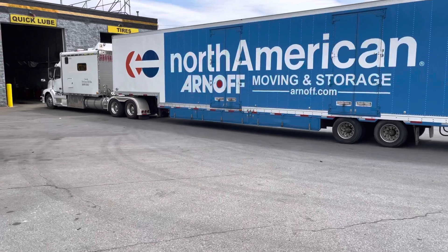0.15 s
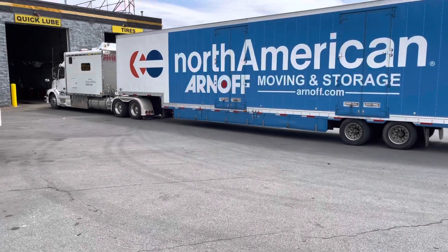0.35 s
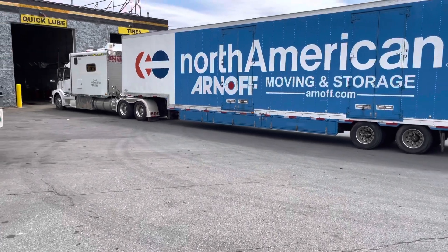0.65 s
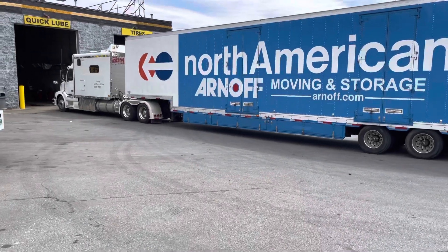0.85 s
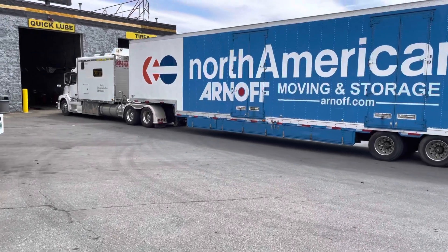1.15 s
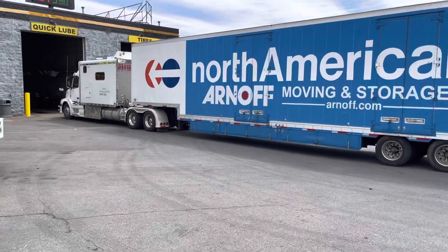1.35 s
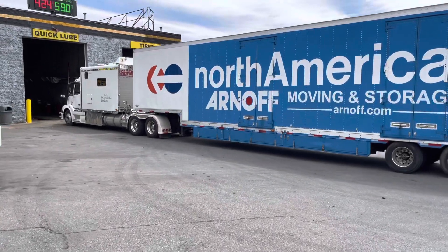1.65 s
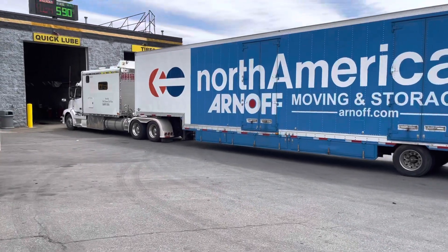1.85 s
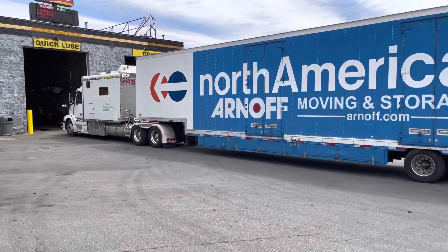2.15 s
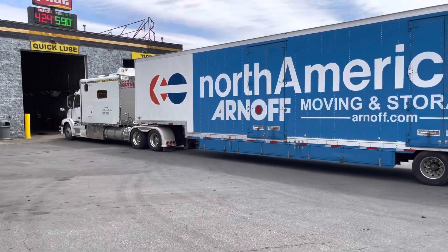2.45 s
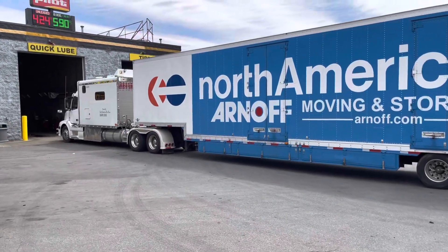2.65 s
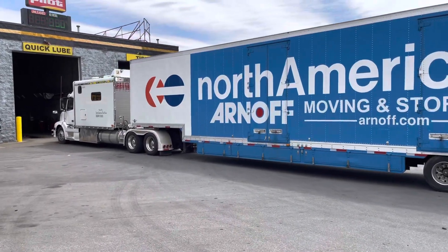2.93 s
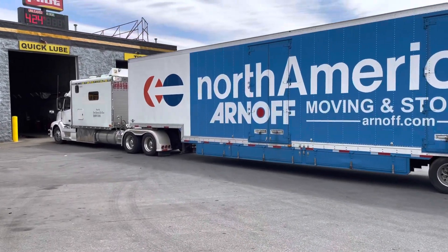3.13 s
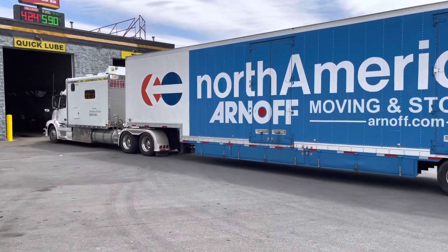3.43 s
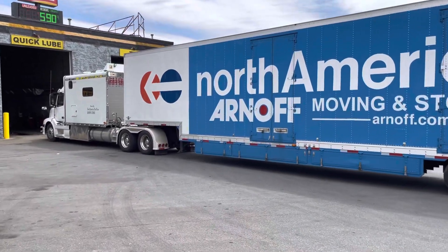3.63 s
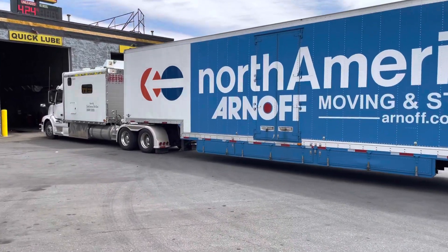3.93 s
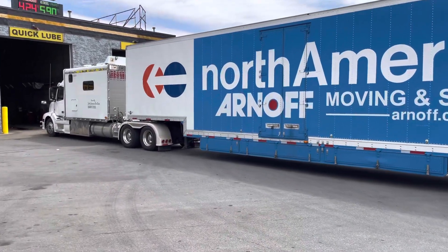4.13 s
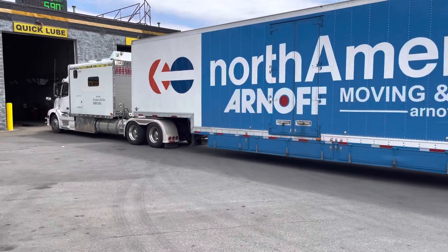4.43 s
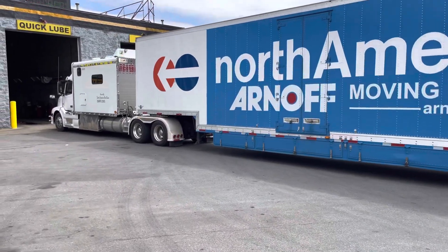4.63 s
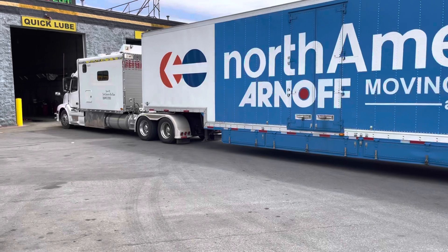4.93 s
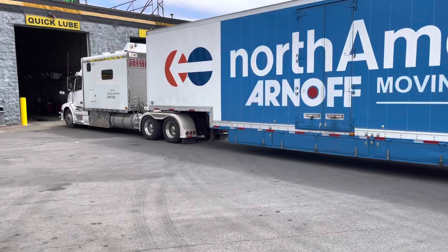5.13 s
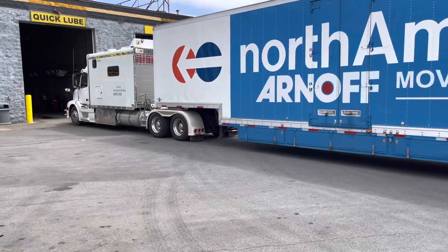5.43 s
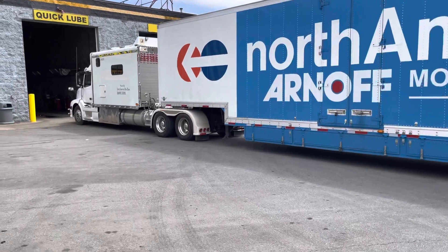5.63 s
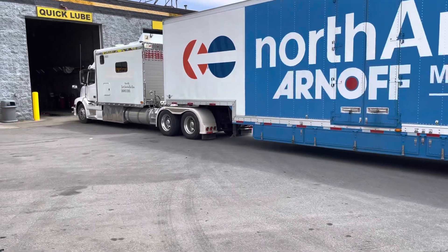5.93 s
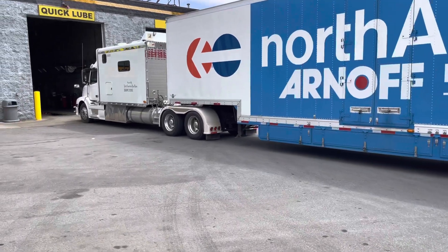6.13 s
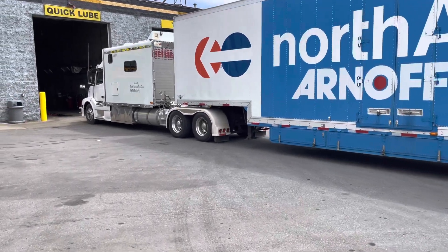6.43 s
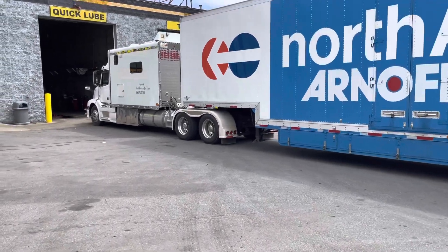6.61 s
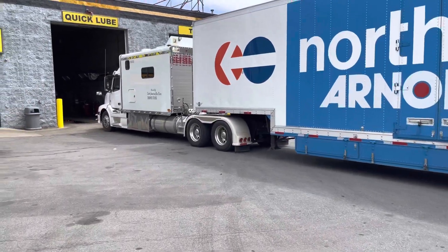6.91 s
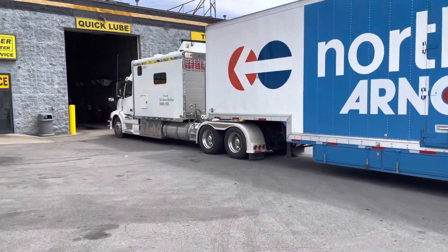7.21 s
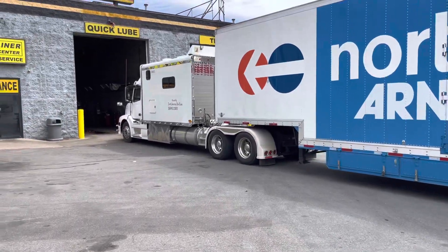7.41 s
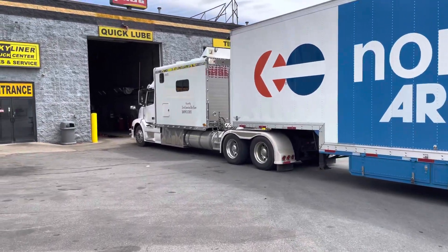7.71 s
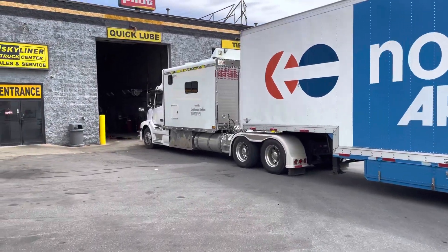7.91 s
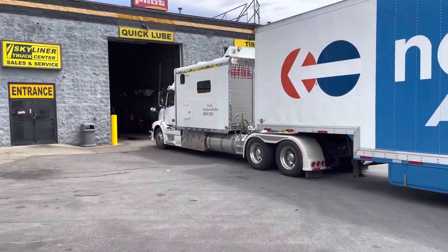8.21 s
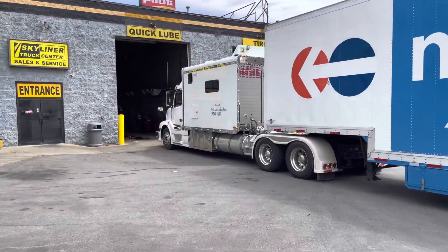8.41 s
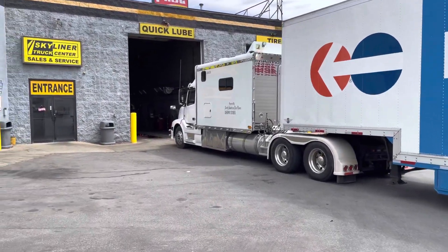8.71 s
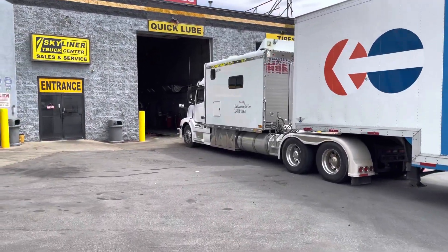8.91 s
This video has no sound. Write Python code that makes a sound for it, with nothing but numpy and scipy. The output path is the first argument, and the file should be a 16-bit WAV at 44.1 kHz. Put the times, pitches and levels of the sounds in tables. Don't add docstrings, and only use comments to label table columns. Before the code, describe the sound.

Outdoors on a paved truck lot, a large diesel idles continuously over a low generator hum and far traffic rumble. Another heavy engine passes, its deep tone swelling at two to four seconds and falling in pitch, then returning in weak echoes off walls. Small grit snaps and a dull footstep tap follow. Near the end a belt hisses and air blows off. Wide handheld stereo pickup, moving closer to the cab.

```python
import sys
import numpy as np
from scipy import signal
from scipy.fft import rfft, irfft, next_fast_len
from scipy.io import wavfile
from scipy.ndimage import uniform_filter1d, map_coordinates

SR = 44100
rng = np.random.default_rng(int(sys.argv[2]) if len(sys.argv) > 2 else 0)


def pcm_store(signal):
    levels = np.round(np.clip(np.atleast_2d(signal), -1, 1) * 32767)
    wavfile.write(sys.argv[1], SR, levels.astype(np.int16).T)


def field_ratio(decibels):
    return 10 ** (np.asarray(decibels, dtype=float) / 20)


N = 399546

# pitch_hz, side_minus_mid_db
WIDTH = [(40, -15.5), (100, -16.5), (200, -11.5), (350, 0.5), (640, -1), (1160, 5), (2090, 1), (3500, -1),
         (6500, -2), (8200, 0.5), (8900, -5), (9700, 7), (10400, 14), (11200, -2)]


def unit(x):
    return x / np.sqrt(np.mean(x ** 2) + 1e-20)


def along(points, hz):
    point_hz, value = np.transpose(points)
    return np.interp(np.log(hz + 1), np.log(point_hz + 1), value)


def curves(rows):
    s, *cols = np.transpose(rows)
    return [np.interp(np.arange(N) / SR, s, c) for c in cols]


def bell(middle_s, half_s):
    return np.exp(-np.abs((np.arange(N) / SR - middle_s) / max(half_s, .01)) ** 2.9)


def bells(rows):
    return sum(db * bell(middle_s, half_s) for middle_s, half_s, db in rows)


def wobble(knots_hz):
    knots = rng.standard_normal(int(N * 40 / SR) + 4)
    return map_coordinates(knots, [np.arange(N) * knots_hz / SR])


def filtered(x, response):
    m = next_fast_len(N + 8192)
    return irfft(rfft(x, m) * response(np.fft.rfftfreq(m, 1 / SR)), m)[..., :N]


def rush(spectrum, patchy_db):
    z = signal.stft(rng.standard_normal((2, N + 512)), nperseg=512)[2]
    field = uniform_filter1d(rng.standard_normal(z.shape[1:]), size=6, axis=0)
    field = uniform_filter1d(field, size=14, axis=1)
    pair = signal.istft(z * field_ratio(patchy_db * unit(field)), nperseg=512)[1][:, :N]
    linked = .3
    trio = [pair[0], linked * pair[0], np.sqrt(1 - linked ** 2) * pair[1]]

    def response(hz):
        level_db = along(spectrum, hz) + [[0], [1], [1]] * along(WIDTH, hz)
        return field_ratio(level_db) * [[1], [-1j], [1]]

    mid, late, free = filtered(trio, response)
    return np.array([mid + late + free, mid - late - free]) / np.std(mid)


def order(shaft_hz, drift, multiple=1):
    turns = multiple * np.cumsum(shaft_hz) / SR
    phase = 2 * np.pi * turns + drift * wobble(3) + rng.uniform(0, 2 * np.pi)
    apart = np.arctan(field_ratio(along(WIDTH, multiple * np.mean(shaft_hz))))
    return np.sqrt(2) * np.sin(phase + np.array([[-apart], [apart]])) / np.cos(apart)


def steady(hz, drift, multiple=1):
    return order(np.full(N, hz), drift, multiple)


def traffic():
    # pitch_hz, density_db
    throb_band = [(21, -36), (36, -9), (75, 4.5), (110, -5.5), (140, -18), (240, -120)]
    # pitch_hz, density_db
    rumble_band = [(56, -35), (95, -2), (392, -13.5), (440, -25.5), (480, -24), (620, -36), (1060, -120)]
    # middle_s, half_s, rise_db
    passes = [
        (1.8, 0.42, 1.5),
        (4.45, 0.66, 2.5),
        (8.8, 0.15, 2),
    ]
    t = np.arange(N) / SR
    throb_db = -28 - 0.68 * t + 0.91 * wobble(3)
    rumble_db = -31.5 - 0.22 * t + bells(passes) + 1.17 * wobble(4)
    throb = field_ratio(throb_db) * rush(throb_band, patchy_db=2.0)
    return throb + field_ratio(rumble_db) * rush(rumble_band, patchy_db=1.23)


def firings(rise_s, decay_s):
    cylinders_db = [0, -14, -22, -18, -7, -20]
    cycle_hz, first_loud_s = 5.434, .06
    times = np.arange(first_loud_s - 1 / cycle_hz, N / SR, 1 / (6 * cycle_hz))
    sizes = field_ratio(np.resize(cylinders_db, len(times)) + 1.5 * rng.standard_normal(len(times)))
    train = np.zeros((2, N))
    keep = times > 0
    train[:, (times[keep] * SR).astype(int)] = [np.ones(keep.sum()), sizes[keep]]
    t = np.arange(SR // 8) / SR
    puff = (1 - np.exp(-t / rise_s)) * np.exp(-t / decay_s)
    return signal.fftconvolve(train, puff[None], axes=1)[:, :N]


def diesel_and_air():
    # time_s, level_db
    idle = [(0, -35.5), (.9, -33.5), (1.7, -33.5), (2.5, -34.5), (3.2, -34.5), (4.6, -35.5), (5.4, -34),
            (6.5, -35), (7.9, -34), (8.5, -34), (9.06, -32.5)]
    # pitch_hz, density_db
    body_band = [(260, -43.5), (450, 0.5), (486, -6.5), (555, -2), (666, -0.5), (766, -1), (1040, -8),
                 (1350, -7.5), (1600, -12), (2100, -22), (3100, -50), (5300, -120)]
    # pitch_hz, density_db
    block_band = [(1100, -39.5), (1600, -2), (2100, 5), (2400, -1.5), (2700, -1.5), (3000, -5), (3300, -6),
                  (3700, -14.5), (4600, -38), (9000, -120)]
    # middle_s, half_s, rise_db
    surges = [
        (2.15, 0.2, 1.7),
        (2.6, 0.34, 2.7),
        (4.9, 0.29, 1.8),
        (8.9, 0.13, 1.7),
    ]
    # pitch_hz, density_db
    hiss_band = [(2600, -36), (3700, -5), (4100, -3.5), (5550, -4.5), (6520, -10), (7130, -18.5),
                 (7990, -14.5), (9270, -17), (10100, -32.5), (11000, -18), (11800, -24), (13000, -41),
                 (22000, -120)]
    # middle_s, half_s, rise_db
    scuffs = [
        (.55, 0.025, 4),
        (2.6, 0.9, 1.5),
        (3.7, 0.6, 1),
        (4.88, 0.22, 4.5),
        (5.87, .06, 3),
        (6.2, 0.15, 3),
        (6.7, .2, 2.5),
        (8.93, .22, 6),
    ]
    # time_s, level_db
    puffs = [(0, -76), (3, -74.5), (6, -73), (6.6, -70.5), (9.06, -70)]
    # pitch_hz, density_db
    valve_band = [(6000, -40), (8500, -14), (9400, 0), (10400, -3), (11100, 2), (11900, -10), (13000, -60)]
    body_db = curves(idle)[0]
    beat, ticks = firings(rise_s=.01, decay_s=.02)
    pulse = unit(1 + .035 * unit(beat - beat.mean()))
    body = field_ratio(body_db) * pulse * rush(body_band, patchy_db=1.18)
    block = field_ratio(body_db - 13.5 + bells(surges)) * pulse * rush(block_band, patchy_db=1.5)
    hiss_db = -56.5 + 0.2 * np.arange(N) / SR + bells(scuffs) + 0.62 * wobble(12)
    hiss = field_ratio(hiss_db) * pulse * rush(hiss_band, patchy_db=1.33)
    valves = field_ratio(curves(puffs)[0]) * unit(unit(ticks) + .35) * rush(valve_band, patchy_db=.5)
    whine = field_ratio(-78 + 3 * wobble(2)) * steady(5503., drift=1.5)
    return body + block + hiss + valves + whine


def generator():
    # middle_s, half_s, change_db
    shadows = [
        (2.76, .06, -9),
        (5, 0.96, -4),
        (7.32, .06, -2),
        (8.35, 0.34, -16),
    ]
    level_db = -24.5 - 1.38 * np.arange(N) / SR + bells(shadows)
    return field_ratio(level_db) * steady(44.97, drift=.1)


def fan():
    # blade_rate_multiple, rms_db
    blades = [(1, -44), (2, -43), (3, -50.5), (4, -48), (6, -49)]
    # middle_s, half_s, rise_db
    gaps = [
        (4.5, 0.2, 5.5),
        (5.7, .3, 4),
        (8.7, 0.43, 4.5),
    ]
    gap_db = bells(gaps)
    return sum(field_ratio(db + gap_db + 2.64 * wobble(5)) * steady(73.9, drift=0.64, multiple=k)
               for k, db in blades)


def panels():
    panel_hz = (569, 681, 748)
    # time_s, low_db, middle_db, high_db
    levels = [(0, -50.5, -58, -52), (1.4, -48, -61, -52), (2, -51, -57, -45), (2.8, -47, -58, -56),
              (4, -52.5, -60, -58), (5.3, -53, -52, -63), (7.3, -55, -50.5, -56), (9.06, -54, -49, -48)]
    return sum(field_ratio(db + 3.4 * wobble(7.2)) * steady(hz, drift=4.85)
               for hz, db in zip(panel_hz, curves(levels)))


def passer():
    # time_s, crank_hz, left_minus_right_db
    crank = [(0, 28.37, -2), (2, 27.18, 2.5), (4.1, 25.29, -1), (5, 24.7, 1), (5.9, 23.58, 2),
             (7.6, 22.62, 1), (9.06, 21.25, -1.5)]
    # time_s, rms_db
    firing = [(0, -33), (.9, -34.5), (2.1, -27), (2.33, -19), (2.65, -25.5), (2.87, -19.5), (3.3, -16),
              (3.7, -19.5), (3.78, -25.5), (4.02, -24), (4.14, -19), (4.5, -24.5), (5.14, -24.5),
              (5.26, -38.5), (9.06, -34)]
    # middle_s, half_s, change_db
    echoes = [
        (5.72, 0.15, 7),
        (5.98, 0.087, -13),
        (6.3, 0.24, 10),
        (7.08, 0.24, 7),
        (7.82, 0.25, 11),
        (8.25, 0.24, 4.5),
        (8.8, 0.1, 6.5),
    ]
    # crank_multiple, quiet_rms_db
    side_orders = [(5, -41.5), (7, -44.5), (8, -47), (11, -51)]
    # side_order_index, middle_s, half_s, top_rms_db
    swells = [(0, 3.83, 0.033, -24), (0, 4.42, 0.18, -27), (0, 5.0, 0.11, -27.5), (1, 1.1, .15, -41.5),
              (1, 1.73, 0.11, -37.5), (1, 2.11, 0.082, -30.5), (1, 2.9, 0.47, -33), (1, 4.0, .12, -34),
              (1, 4.67, 0.45, -32.5), (2, 3.85, 0.11, -34), (2, 4.42, .15, -32), (2, 4.9, 0.11, -32.5),
              (2, 5.9, .4, -40.5), (3, 3.75, 0.066, -36), (3, 4.75, 0.18, -42)]
    crank_hz, pan_db = curves(crank)
    crank_hz = uniform_filter1d(crank_hz, size=SR // 2)
    firing_db = curves(firing)[0] + bells(echoes) + 1.2 * wobble(11)
    out = field_ratio(firing_db) * order(crank_hz, drift=.2, multiple=4)
    for index, (multiple, quiet_db) in enumerate(side_orders):
        gain = field_ratio(quiet_db + 3.33 * wobble(7))
        for which, middle_s, half_s, top_db in swells:
            if which == index:
                gain = gain + field_ratio(top_db - 1.5) * bell(middle_s, half_s)
        out = out + gain * field_ratio(1.8 * wobble(13)) * order(crank_hz, drift=.6, multiple=multiple)
    return out * field_ratio(pan_db * np.array([[.5], [-.5]]))


def steps():
    # start_s, peak_db, centre_hz, left_minus_right_db, width_octaves
    grit = [(.536, -36, 6500, -2, 0.65), (0.7574, -46, 3280, -5, 0.054), (1.7533, -44, 7002, 3, 0.7),
            (2.3406, -43, 7500, 4, 0.606), (2.604, -38.5, 7740, -2, 0.44), (2.619, -42.5, 9460, -3, .5),
            (3.22, -39, 9750, 4, 0.72), (3.8543, -39, 5750, 2, 0.45), (4.03, -39, 3320, 2, .3),
            (4.681, -46, 8320, 2, 0.35), (5.68, -44.5, 7360, 3, 0.72), (5.837, -50, 9000, 4, .5),
            (5.8546, -29, 3970, -1, 1.8), (5.872, -29, 6960, 2.5, 2.7), (6.0072, -39.5, 10500, 4, 0.73),
            (6.2861, -39.5, 11050, 3, 0.45), (6.4747, -45.5, 8914, 1, 0.27), (7.4644, -48, 7001, 4, 0.47),
            (7.6115, -33, 7000, 3, 1.1), (7.7143, -38.5, 6000, 1, 0.69)]
    # start_s, level_db, pitch_hz, t60_s
    knock = [
        (5.8546, -18, 780, .012),
        (5.855, -28, 1500, .007),
        (5.855, -36, 2600, .005),
    ]
    out, t = np.zeros((2, N + SR)), np.arange(SR // 16) / SR
    hz = np.fft.rfftfreq(len(t), 1 / SR)
    for start_s, db, centre_hz, pan_db, octaves in grit:
        away = np.log2((hz + 1) / centre_hz) / max(octaves, .05)
        band = field_ratio(-9 * away ** 2 - 8 * np.clip(hz / 1000 - 11.8, 0, 9))
        common, left, right = irfft(rfft(rng.standard_normal((3, len(t)))) * band, len(t))
        decay = field_ratio(-60 * t / (0.0044 + 0.0012 / octaves)) + .02 * field_ratio(-60 * t / 0.11)
        shape = (1 - np.exp(-t / 0.0012)) * decay
        snap = unit(common + .6 * np.array([left, right])) * shape
        gain = field_ratio(db + 9 + np.array([[pan_db], [-pan_db]]) / 2)
        out[:, round(start_s * SR):][:, :len(t)] += gain * snap
    for start_s, db, pitch_hz, t60_s in knock:
        swell = field_ratio(-60 * t / t60_s) * (1 - np.exp(-t / .005)) ** 2
        tap = swell / swell.max() * np.sin(2 * np.pi * pitch_hz * t)
        out[:, round(start_s * SR):][:, :len(t)] += field_ratio(db) * tap
    return out[:, :N]


def belt():
    # time_s, level_db
    near = [(0, -82), (7, -60.5), (7.4, -62), (8.3, -55.5), (8.6, -62), (8.8, -53), (9.06, -56)]
    # pitch_hz, density_db
    band = [(2400, -60), (3000, -10), (3300, 0), (3800, -4), (4800, -60)]
    return field_ratio(curves(near)[0]) * rush(band, patchy_db=.6)


def scene():
    return traffic() + diesel_and_air() + generator() + fan() + panels() + passer() + steps() + belt()


def gate_treble(x):
    # pitch_hz, mid_margin_db, side_margin_db
    margins = [(6850, -12, -14), (7050, -1, -3), (7300, -10, -6), (8300, -7, -10), (8800, -8, -5),
               (9400, -12, -6), (9660, -13, -12), (9800, 12.5, -12), (10070, 16, -12), (10650, -1.5, -10),
               (11700, 0.5, 4.5), (11560, -3, 2), (11750, 16.5, 9.5)]
    hz, _, z = signal.stft([x[0] + x[1], x[0] - x[1]], SR, nperseg=1024)
    power = uniform_filter1d(np.abs(z) ** 2, size=12, axis=1)
    power = np.abs(uniform_filter1d(power, size=3, axis=2))
    edge_hz, mid_db, side_db = np.transpose(margins)
    margin_db = np.array([np.interp(hz, edge_hz, db, left=-99) for db in (mid_db, side_db)])
    kept = power > np.median(power, axis=2, keepdims=True) * field_ratio(2 * margin_db)[..., None]
    mid, side = signal.istft(z * kept, SR, nperseg=1024)[1][:, :N]
    return np.array([mid + side, mid - side]) / 2


def roll_off(x):
    return signal.sosfilt(signal.butter(12, 12930, fs=SR, output="sos"), x)


def record(dry):
    # pitch_hz, left_minus_right_db
    lean = [(40, 0.1), (200, -3), (400, -0.4), (800, 1.5), (1500, 0.5), (3000, -2.4), (6000, 4),
            (10000, -0.5)]
    leaned = filtered(dry, lambda hz: field_ratio(along(lean, hz) * np.array([[.5], [-.5]])))
    mix = gate_treble(leaned)
    return roll_off(mix)


dry = scene()
out = record(dry)
pcm_store(out)
```